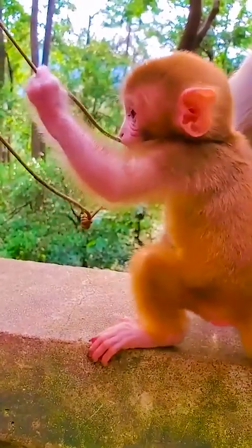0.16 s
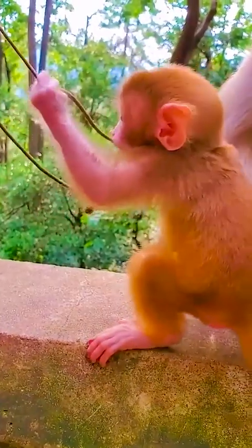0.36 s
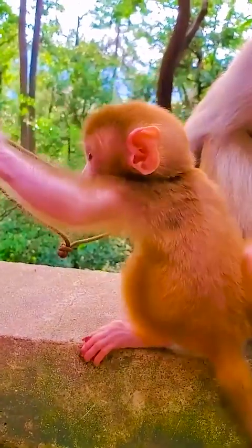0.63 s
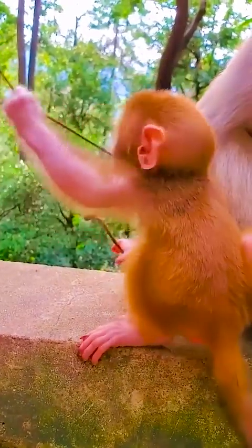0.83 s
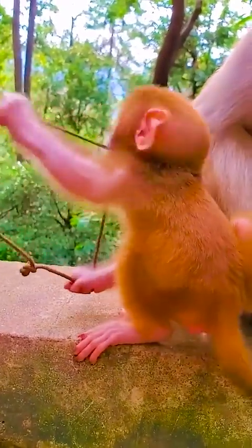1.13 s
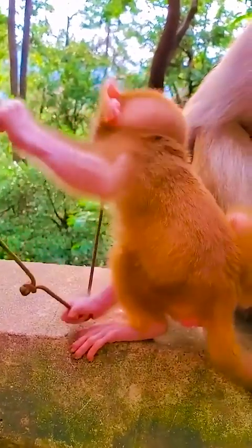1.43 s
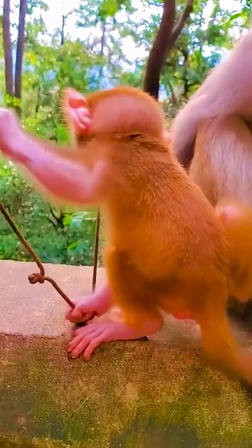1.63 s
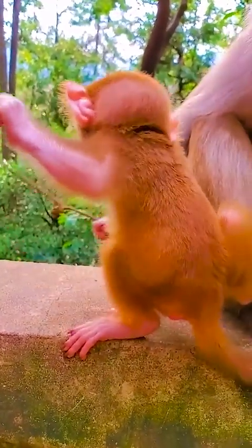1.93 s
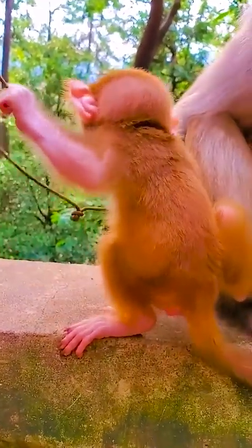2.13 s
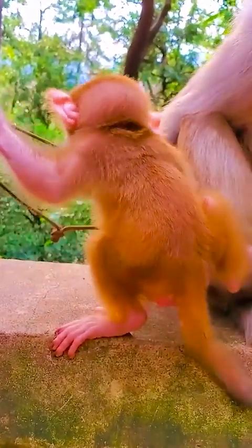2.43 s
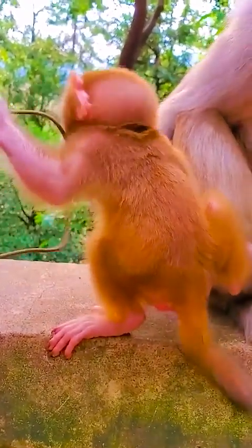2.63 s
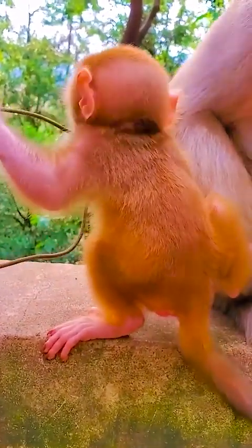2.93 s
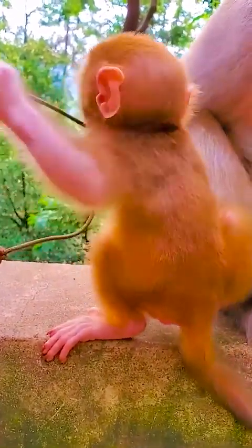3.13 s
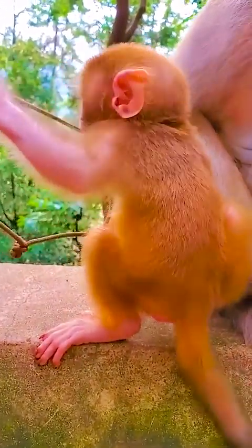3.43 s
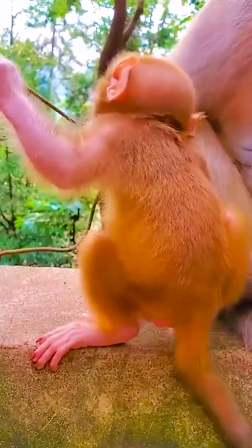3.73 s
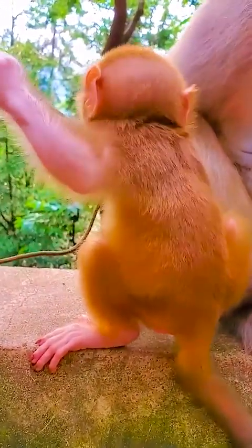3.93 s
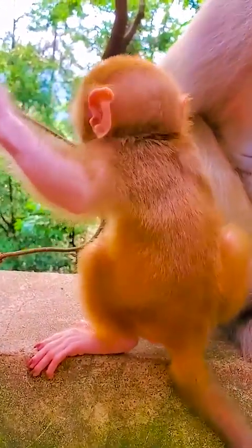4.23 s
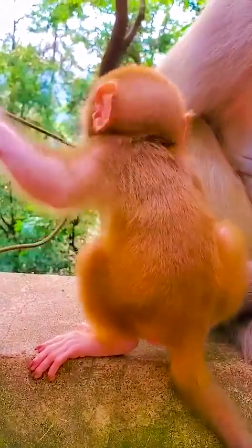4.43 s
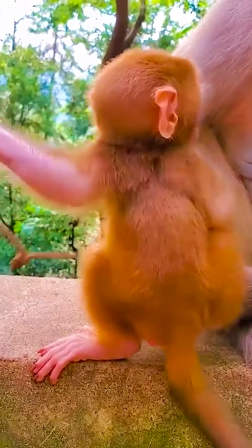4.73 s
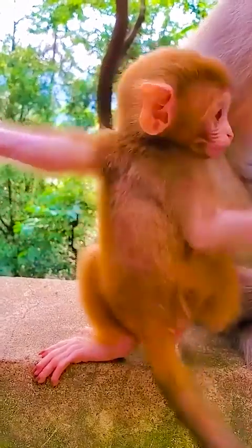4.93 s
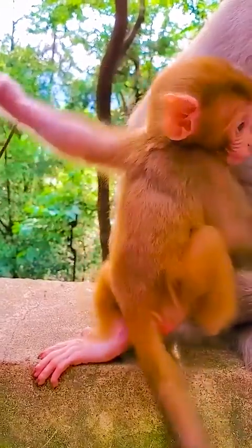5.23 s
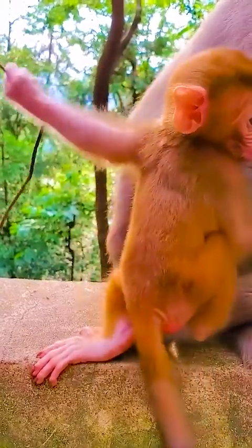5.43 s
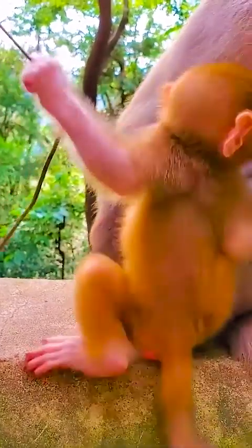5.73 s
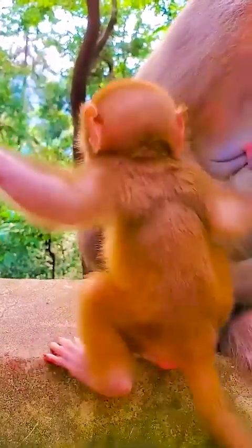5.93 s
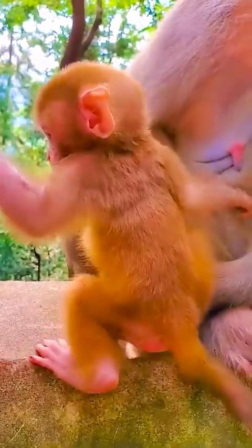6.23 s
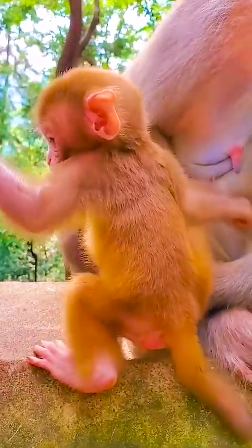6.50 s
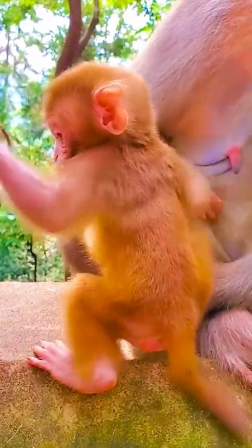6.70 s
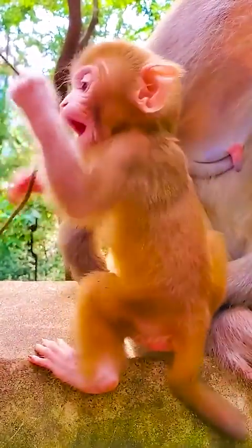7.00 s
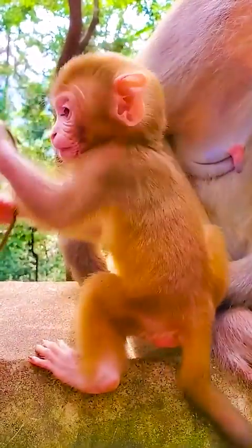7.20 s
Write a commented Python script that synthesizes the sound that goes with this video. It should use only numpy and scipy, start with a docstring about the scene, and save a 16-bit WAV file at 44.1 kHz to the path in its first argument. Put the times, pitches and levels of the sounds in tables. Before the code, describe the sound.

The place is open and wooded, with a quiet low rumble and airy leaf hiss that jump up at about 0.7 seconds. An engine idles underneath as a steady deep hum, rising slightly in pitch by 0.9. Distant birds whistle short gliding notes with woodland echo, most clearly near 1.0, 4.3 and 6.4. Tiny grainy rustles brush by before 2.8. From 2.9 soft, dull knocks tap irregularly at the right until 6.2. At 3.1 a baby monkey gives a soft, hoarse half-second coo that lifts, then drops. From 4.2 it squeals in quick high bursts, close at left: raspy screams at 4.5 and 4.8, cleaner squeaks at 5.3, 5.6 and 5.9, a rising whistle at 6.1, and a brief hollow hoot at 6.3. A longer wavering squeal starts at 6.4; a harsh cry at 6.9 thins into a faint whine until the end at 7.4.

```python
"""Baby monkey calling in a wood

A baby monkey on a wall coos once, then squeals in quick bursts close to the left microphone, with one hollow hoot.
Its voice is built from harmonics that flip between clean whistle and harsh rasp, and it overloads the recorder.
Behind it an engine hums in firing orders, and far birds whistle gliding notes into the echo of the trees.
Soft damped knocks come from the right; grainy brushes and an early jump in level colour the rumble and hiss."""
import sys
import numpy as np
from scipy import signal
from scipy.fft import rfft, irfft, next_fast_len
from scipy.io import wavfile

SR = 44100
rng = np.random.default_rng(int(sys.argv[2]) if len(sys.argv) > 2 else 0)


def waveform_to_disk(signal):
    """Save audio, clipped to [-1, 1], as 16-bit WAV at the path in sys.argv[1]."""
    frames = np.transpose(np.atleast_2d(signal))
    scaled = np.clip(frames, -1, 1) * 32767
    samples = np.round(scaled).astype(np.int16)
    wavfile.write(sys.argv[1], SR, samples)


N = 324576
TIME = np.arange(N) / SR

# the coo as a gesture of the voice: time_s, pitch_hz, effort_db
COO = [(3.075, 660, -44), (3.241, 634, -40), (3.281, 693, -36), (3.359, 731, -31), (3.501, 759, -29),
       (3.533, 707, -31), (3.555, 606, -50)]
# a brief hollow hoot: start_s, length_s, pitch_hz, level_db, third_harmonic_db
HOOT = (6.284, .039, 772, -20, -11)
# far bird notes, each: length_s, start_hz, end_hz, fade_db, burr (share of the pitch)
FALLING_NOTE = (.3, 3400, 2110, -16, .02)
RISING_NOTE = (.2, 2950, 3090, -22, .02)
THIN_NOTE = (.2, 4290, 4260, -10, .008)
STEADY_NOTE = (.2, 3920, 3930, -6, .025)
HIGH_NOTE = (.16, 4540, 4510, -9, .025)
LOW_NOTE = (.17, 2680, 2740, -11, .02)


def amp(db):
    """Decibels to gain."""
    return 10 ** (np.asarray(db) / 20)


def unit(x):
    """Scales to rms 1."""
    return x / np.sqrt(np.mean(abs(x) ** 2) + 1e-20)


def read(points, hz):
    """Reads a spectrum table on a log-frequency axis."""
    f, value = np.transpose(points)
    return np.interp(np.log(hz + 1), np.log(f + 1), value)


def curves(rows, t=None):
    """The columns of a table at each sample, over its own span unless times are given."""
    s, *columns = np.transpose(rows)
    t = np.arange(s[0], s[-1], 1 / SR) if t is None else t
    return [np.interp(t, s, column) for column in columns]


def add(mix, s, sound):
    """Mixes a sound in at a time in seconds."""
    part = mix[max(round(s * SR), 0):][:len(sound)]
    part += sound[:len(part)]


def colour(x, points):
    """Filters by a spectrum table."""
    size = min(N, next_fast_len(2 * x.shape[-1]))
    gain = amp(read(points, np.fft.rfftfreq(size, 1 / SR)))
    return irfft(rfft(x, size) * gain, size)


def wander(size, width_hz):
    """Complex noise of rms 1 that changes at about the given rate."""
    hz = np.fft.fftfreq(next_fast_len(size + 8192), 1 / SR)
    z = rng.standard_normal((len(hz), 2)) @ [1, 1j]
    return unit(np.fft.ifft(z / (1 + (hz / width_hz) ** 4)))[:size]


def phase_of(hz):
    """Running phase of a pitch curve."""
    return 2 * np.pi * np.cumsum(hz) / SR


def faded(x, edge_s=0.00089):
    """Softens both ends."""
    return x * signal.windows.tukey(len(x), min(2 * edge_s * SR / len(x), 1))


def outdoors(rumble_db=-1, rumble_side_db=-16, hiss_db=6, swell_db=2.0, right_treble_db=-4, one_sided=0.67):
    """Low rumble, nearly alike in both ears, under a wide hiss of air and leaves, part of it from the left."""
    # course of the background before the overall trims: time_s, rumble_db, hiss_db
    background_levels = [(0.0, -46.5, -59), (0.665, -45.5, -58), (0.69, -36.5, -50.5), (3.6, -33.5, -49),
                         (7.36, -35, -47.5)]
    # relative spectrum of the rumble: frequency_hz, density_db
    rumble_spectrum = [(10, -42), (22, -6), (36, -7.5), (50, -13.5), (75, -5.5), (100, 2), (135, -1),
                       (165, -7), (205, -15), (290, -17.5), (410, -32), (650, -64), (1200, -100)]
    # relative spectrum of air and leaves: frequency_hz, density_db
    hiss_spectrum = [(200, 3.5), (450, -5), (900, 0.5), (2200, -2.5), (3500, -6), (5000, -11),
                     (9000, -18.5), (15000, -21.5)]
    low_db, air_db = curves(background_levels, TIME)
    middle, side, shared, left, right = rng.standard_normal((5, N))
    side = colour(side, [(60, -6), (150, 0), (300, 12)])  # shorter waves differ more between the ears
    side_rumble = amp(rumble_side_db) * unit(colour(side, rumble_spectrum))
    rumble = unit(colour(middle, rumble_spectrum)) + np.array([[1], [-1]]) * side_rumble
    late = np.roll(shared, 25)  # samples; the shared part reaches the right ear later
    left = left + one_sided * shared
    right_colour = [(500, 1), (2000, -5), (5000, right_treble_db), (15000, -3.5)]
    right = colour(right + one_sided * late, right_colour)
    hiss = unit(colour(np.array([left, right]), hiss_spectrum))
    swell = swell_db * wander(N, 3.4).real
    return amp(low_db + rumble_db) * rumble + amp(air_db + hiss_db + swell) * hiss


def engine(throb=.11, unsteady=0.4):
    """An idling engine: a slightly throbbing tone at the firing rate and weaker, wavering orders."""
    # course of the idle: time_s, firing_rate_hz, level_db
    idle = [(0.0, 54.3, -51), (0.57, 55.8, -43.5), (0.86, 61.2, -35), (2.09, 61.1, -30.5), (3.3, 61.3, -31),
            (5.18, 59.7, -29), (5.58, 60.0, -32), (6.07, 59.9, -28.5), (7.36, 59.9, -29.5)]
    # partials of the hum: multiple_of_firing_rate, order_level_db
    orders = [(2 / 3, -19), (1, 0), (4 / 3, -23), (2, -10), (7 / 3, -13.5), (10 / 3, -23)]
    firing_hz, level_db = curves(idle, TIME)
    phase = phase_of(firing_hz)
    hum = np.zeros(N)
    for k, order_db in orders:
        depth = throb if k == 1 else unsteady
        wavering = 1 + depth * wander(N, 3.6)
        hum += amp(order_db) * (wavering * np.exp(1j * k * phase)).real
    return np.sqrt(2) * amp(level_db) * hum


def trees(x):
    """Scatter from trunks and leaves: sparse taps, unrelated per ear, each band dying at its own speed."""
    # decay of the echo in the wood: frequency_hz, t60_s
    wood_decay = [(300, 0.2), (2000, 0.84), (3500, 1.35), (8000, 1.1), (15000, 0.55)]
    taps = rng.standard_normal((2, SR)) * (rng.random((2, SR)) < .06)
    hz, t, z = signal.stft(taps, SR, nperseg=256)
    decay = amp(-60 * t / read(wood_decay, hz)[:, None])
    z = z * decay * np.minimum(t / 0.005, 1)
    tail = signal.istft(z, SR, nperseg=256)[1]
    return signal.fftconvolve(x[None], tail / np.linalg.norm(tail[0]), axes=1)[:, :N]


def birds(direct_db=-5, right_db=-5, octave_db=-30):
    """Far whistled notes that glide to a pitch with a fast burr and fade, half lost in their own echo."""
    # calls, levels before the path gains: start_s, level_db, note
    bird_calls = [(0, -53, THIN_NOTE), (0.92, -52, THIN_NOTE), (1.04, -29, FALLING_NOTE),
                  (1.781, -40.5, RISING_NOTE), (2.889, -47.5, STEADY_NOTE), (2.918, -49.5, HIGH_NOTE),
                  (3.55, -48, STEADY_NOTE), (4.265, -31, FALLING_NOTE), (4.97, -51, RISING_NOTE),
                  (6.43, -27.5, FALLING_NOTE), (7.17, -45, LOW_NOTE)]
    rise_s, glide_s = .02, .05
    song = np.zeros(N)
    for s, level_db, (length_s, start_hz, end_hz, fade_db, burr) in bird_calls:
        t = np.arange(0, length_s, 1 / SR)
        hz = end_hz + (start_hz - end_hz) * np.exp(-t / glide_s)
        envelope = np.minimum(t / rise_s, 1) * amp(level_db + fade_db * (t / length_s) ** 2)
        phase = phase_of(hz * (1 + burr * wander(len(hz), 142).real))
        whistle = np.sin(phase) + amp(octave_db) * np.sin(2 * phase)
        add(song, s, faded(envelope * whistle, 0.0027))
    return np.sqrt(2) * amp([[0], [right_db]]) * (amp(direct_db) * song + trees(song))


def knocks(level_db=7, ring_hz=330, decay_s=0.0016, rise_s=0.0003, left_db=-7, delay_s=0.0017):
    """Dull taps near the right microphone: a single heavily damped swing each."""
    # soft knocks, before the delay and overall level: start_s, peak_db
    knock_times = [(2.914, -28), (2.987, -43), (3.442, -27), (3.711, -32.5), (3.966, -29), (4.221, -31),
                   (4.551, -30.5), (4.751, -30.5), (5.21, -27), (5.446, -32), (5.67, -27.5), (5.953, -30),
                   (6.199, -32)]
    t, taps = np.arange(900) / SR, np.zeros(N)
    tap = np.cos(2 * np.pi * ring_hz * t) * np.exp(-t / decay_s) * (1 - np.exp(-(t / rise_s) ** 2))
    for s, peak_db in knock_times:
        add(taps, s + delay_s, amp(peak_db + level_db) * tap / tap.max())
    return amp([[left_db], [0]]) * taps


def rustles(grain_db=3):
    """Short grainy noise brushes, stronger on the left, as the monkey shifts its grip."""
    # brushes of fur and twig, levels before colouring: start_s, length_s, level_db
    brushes = [(.24, 0.011, -55), (0.788, 0.0091, -50), (.8, 0.17, -54.5), (1.7, 0.18, -57),
               (2.375, 0.0147, -54), (2.48, 0.016, -56), (2.727, .08, -57)]
    out = np.zeros(N)
    for s, length_s, level_db in brushes:
        size = int(length_s * SR)
        grain = amp(level_db + grain_db * wander(size, 200).real)
        add(out, s, grain * np.hanning(size) * rng.standard_normal(size))
    return amp([[3], [-3]]) * colour(out, [(500, -6), (2500, -5), (8000, 6), (15000, -11)])


def coo(jitter=.01, breath=.7, second_db=-3, upper_db=-4.5, hoarse_db=-32, patchy_db=5):
    """A soft low call: two strong harmonics and a faint stack shaped by the throat, hoarse as it lifts."""
    # throat resonances over the upper stack: frequency_hz, gain_db
    coo_throat = [(1900, 13), (2300, 2), (3000, -19), (4500, -3), (5200, 7.5), (6200, 2), (7300, 5.5),
                  (8000, -2), (9600, 0), (11000, -20)]
    # relative spectrum of air through the throat: frequency_hz, density_db
    hoarse_spectrum = [(1000, -11), (2400, -9), (3300, 0.5), (3900, 4), (4500, -18), (7000, -20),
                       (12000, -31)]
    loud_db, bloom = -30, .45  # overtones gain this many extra dB for each dB of effort
    hoarse_at_s, hoarse_fade_db_per_s = 3.34, 70  # the air is loudest as the pitch lifts
    hz, effort_db = curves(COO)
    size = len(hz)
    overtones_db = effort_db + bloom * (effort_db - loud_db)
    air_db = hoarse_db - hoarse_fade_db_per_s * abs(COO[0][0] + TIME[:size] - hoarse_at_s)
    phase = phase_of(hz * (1 + jitter * wander(size, 146).real))
    stack = np.zeros(size)
    for k in range(3, 16):
        breathy = 1 + breath * wander(size, 110)
        patchy = amp(patchy_db * wander(size, 8.4).real)
        stack += amp(read(coo_throat, k * hz)) * (breathy * patchy * np.exp(1j * k * phase)).real
    low = amp(effort_db) * np.cos(phase) + amp(overtones_db + second_db) * np.cos(2 * phase)
    air = amp(air_db) * unit(colour(rng.standard_normal(N), hoarse_spectrum)[:size])
    return faded(np.sqrt(2) * low + amp(overtones_db + upper_db) * unit(stack) + air, 0.013)


def hoot(jitter=.012, edge_s=.012):
    """A short steady note through rounded lips: fundamental and third harmonic only."""
    _, length_s, hz, level_db, third_db = HOOT
    phase = phase_of(hz * (1 + jitter * wander(int(length_s * SR), 150).real))
    tone = np.cos(phase) + amp(third_db) * np.cos(3 * phase)
    return faded(np.sqrt(2) * amp(level_db) * tone, edge_s)


def throat(hz, effort_db, mouth):
    """Levels of fundamental, second harmonic and the rest: all follow effort, shaped by throat and mouth."""
    # resonances that the two lowest harmonics sweep through: frequency_hz, gain_db
    resonances = [(1500, 5), (2400, 1.5), (2950, 2.5), (3400, 6.5), (3800, 2.5), (4300, 1), (5000, -1.5),
                  (5600, -5), (6200, 0), (7400, 1), (9500, -1)]
    closed_db = -24  # overtones once the mouth has closed
    gape_start_db, gape_end_db, second_db, _, closing_s = mouth
    left_s = np.arange(len(hz))[::-1] / SR
    overtones_db = effort_db + closed_db * np.clip(1 - left_s / max(closing_s, 1 / SR), 0, 1)
    gape_db = np.linspace(gape_start_db, gape_end_db, len(hz))  # a wide gape weakens the fundamental
    first_db = effort_db + read(resonances, hz) - gape_db
    return first_db, overtones_db + read(resonances, 2 * hz) + second_db, overtones_db


def squeak(length_s, effort_db, rough, attack_s, arch):
    """Pitch, effort and roughness of a squeak: one arch of pitch under an attack, a hold and a release."""
    kick_s, release_s, rise_power, fall_power = .005, .008, 2.05, 2.7
    start_hz, turn_hz, end_hz, turn, kick_hz = arch
    t = np.arange(0, length_s, 1 / SR)
    before = np.interp(t / length_s, [0, turn], [1, 0])
    after = np.interp(t / length_s, [turn, 1], [0, 1])
    hz = turn_hz + (start_hz - turn_hz) * before ** rise_power + (end_hz - turn_hz) * after ** fall_power
    envelope = np.clip(t / attack_s, 1e-3, 1) * np.clip((length_s - t) / release_s, 1e-3, 1)
    return hz + kick_hz * np.exp(-t / kick_s), effort_db + 20 * np.log10(envelope), rough


def squeal(hz, effort_db, rough, mouth, jitter=.05, tremor=.006, flutter_db=1.5,
           rasp_share=0.97, breath=0.001, attack_s=0.00079):
    """Tight vocal folds whistle; in chaos, pitch and level flutter and harmonics give way to a broad rasp."""
    # shape of the upper harmonics: frequency_hz, gain_db
    wide_mouth = [(2200, 18), (4500, 1), (7000, -12), (9500, 1.5), (12500, 1), (15000, -1.5), (17000, -11),
                  (20000, -37)]
    # colour of the rasp: frequency_hz, gain_db
    rasp_colour = [(900, -17.5), (2000, -10.5), (3000, 0), (4200, -4.5), (5200, -3.5), (8000, -0.5),
                   (15000, -3.5), (19000, -18)]
    first_db, second_db, upper_db = throat(hz, effort_db, mouth)
    bright_db = mouth[3]
    size, rough = len(hz), np.clip(rough, 0, 1)
    t = np.arange(size) / SR
    shake = tremor * wander(size, 350).real + jitter * rough * wander(size, 110).real
    phase = phase_of(hz * (1 + shake))
    upper = amp([read(wide_mouth, k * hz) + bright_db * min(k, 6) for k in range(3, 11)])
    upper = amp(upper_db) * upper / np.linalg.norm(upper, axis=0)
    whistle, rasp = np.zeros((2, size))
    for k, height in enumerate([amp(first_db), amp(second_db), *upper], 1):
        flutter = amp(flutter_db * (.5 + .7 * rough) * wander(size, 105).real)
        below_top = np.clip((SR / 2.2 - k * hz) / 1500, 0, 1)  # avoids aliasing
        onset = 1 - np.exp(-t / (attack_s * k))  # high harmonics start last
        turn = height * flutter * below_top * onset * np.exp(1j * k * phase)
        order = .85 if k == 1 else 2.6 * k  # high harmonics lose their order first
        clean = (1 - rasp_share * rough ** 1.3) ** order * (1 - breath)
        breaks = np.sqrt(1 - rough ** 2) + rough * wander(size, 127)  # the whistle catches and slips
        whistle += np.sqrt(clean) * (breaks * turn).real
        # the rasp fills the gaps between harmonics; fleeting side tones come and go in it
        side_tones = sum(wander(size, 30) ** 2 * np.exp(1j * step * phase)
                         for step in rng.uniform(-.45, .45, 2))
        noise = wander(size, 1300 if k == 1 else 2000) + .33 * side_tones
        rasp += np.sqrt(1 - clean) * (unit(noise) * turn).real
    return faded(np.sqrt(2) * (whistle + colour(rasp, rasp_colour)[:size]), 0.0014)


def second_tone(main_hz, coupling=0.56, jitter=0.019, edge_s=.003):
    """A second oscillator in the larynx rides above the main one, which chops it into side tones."""
    # the higher tone: length_s, multiple_of_pitch, level_db
    higher_tone = (.034, 2.48, -6)
    length_s, ratio, level_db = higher_tone
    main_hz = main_hz[:int(length_s * SR)]
    tone = np.cos(phase_of(ratio * main_hz * (1 + jitter * wander(len(main_hz), 600).real)))
    chop = 1 + coupling * np.cos(phase_of(main_hz))
    return faded(amp(level_db) * tone * chop, edge_s)


def monkey(wall_db=-20, wood_db=-29, right_wood_db=-5, sway_hz=9):
    """The voice reaches the left microphone directly, the right one shadowed and by way of wall and bodies."""
    # short squeaks, one pitch arch each: start_s, length_s, effort_db, roughness (0-1), attack_s, arch, mouth
    # arch: start_hz, turn_hz, end_hz, turn_place (0-1), onset_kick_hz (added on top)
    # mouth: gape_start_db, gape_end_db, second_harmonic_db, brightness_db (per harmonic number), closing_s
    squeaks = [ (4.197, .026, -27, .03, .002, (2970, 2950, 2150, .1, 0), (6, -7, 6, -2, .012)),
               (4.317, .053, -11.5, .13, .001, (2500, 3980, 3000, .6, 1200), (4, -3, -1, 0, .022)),
               (5.312, .058, -10, .02, .007, (3130, 3950, 3000, .52, 0), (9, -1, -.5, -1.5, .014)),
               (5.885, .068, -16, .04, .012, (3780, 2930, 2900, .97, 750), (3, 22, 1, -2, .014)),
               (6.267, .039, -21, .1, .016, (3300, 3200, 2780, .1, 0), (13, 12, -3, -1, .01))]
    # longer squeals that waver between whistle and scream: mouth (as above), rows
    # each row: time_s, pitch_hz, effort_db, roughness (0-1)
    squeals = [ ((14, -3, -2, 0, .018), [(4.488, 3450, -8, .45), (4.522, 3050, -7.5, .65),
               (4.548, 4300, -9.5, .85), (4.598, 4950, -12, .55), (4.62, 3850, -10.5, 1),
               (4.664, 3950, -16, 1), (4.675, 4760, -17, .2), (4.708, 3600, -14, .1),
               (4.72, 2520, -17, .1)]), ((1, 6, -17, 3.5, .015), [(4.815, 1877, -14, 1),
               (4.83, 3050, -9, .8), (4.848, 3407, -9, .3), (4.875, 3065, -18.5, .77),
               (4.905, 2887, -8.5, .15), (4.93, 2440, -12.5, .44), (4.947, 1610, -20, .6)]),
               ((14, 16, 1, -3.5, .012), [(5.58, 3700, -15, .02), (5.589, 2936, -16, .15),
               (5.602, 2585, -16, .14), (5.64, 3050, -16, .18), (5.666, 2980, -31, .11),
               (5.688, 2520, -14, .01), (5.708, 2720, -26, 0)]), ((28, -3, -1, -1, .008),
               [(6.103, 2940, -31, .07), (6.142, 3420, -19, .01), (6.159, 3620, -10, .01),
               (6.178, 3660, -12, 0), (6.2, 3950, -8.5, 0), (6.25, 3500, -17.5, .01),
               (6.267, 2700, -21, 0)]), ((10, 2, -5, -1, .02), [(6.407, 1600, -14, .2),
               (6.428, 3400, -12, .25), (6.47, 4125, -13, .45), (6.545, 3640, -21, .95),
               (6.562, 3573, -20, .01), (6.62, 3480, -21, 0), (6.67, 3670, -17, 0),
               (6.71, 4130, -12.5, .11), (6.758, 3150, -14, .65), (6.805, 1536, -22, .6)]),
               ((6, -8, -3.5, .5, .001), [(6.938, 1590, -18, 1), (6.955, 3070, -10, .5),
               (6.975, 4020, -13, .9), (7.015, 4300, -18, .42), (7.063, 2990, -21.5, .42),
               (7.14, 3200, -23, .5), (7.172, 3650, -23.5, .2), (7.19, 3900, -27, .03),
               (7.257, 4020, -26.5, .02), (7.283, 3680, -28, .01), (7.36, 3820, -27, .02)])]
    # the right microphone lies in the shadow of the camera: frequency_hz, gain_against_left_db
    shadow = [(300, 8), (750, -30.5), (1400, 5), (2400, -12), (3600, -12.5), (6000, -15), (9000, -21),
              (15000, -24)]
    voice = np.zeros(N)
    for s, *shape, mouth in squeaks:
        add(voice, s, squeal(*squeak(*shape), mouth))
    for mouth, rows in squeals:
        add(voice, rows[0][0], squeal(*curves(rows), mouth))
    s, *shape, _ = squeaks[1]  # the roughest squeak
    add(voice, s, second_tone(squeak(*shape)[0]))
    add(voice, HOOT[0], hoot())
    add(voice, COO[0][0], coo())
    bent = signal.hilbert(colour(voice, shadow)).imag  # bending round the camera costs about a quarter cycle
    t = np.arange(2000) / SR
    bounces = rng.standard_normal(len(t)) * (rng.random(len(t)) < .1) * np.exp(-t / 0.009)
    echoes = signal.hilbert(signal.oaconvolve(voice, bounces / np.linalg.norm(bounces))[:N])
    right = bent + amp(wall_db) * (echoes * wander(N, sway_hz)).real  # the paths shift as the head turns
    wood_gain = amp([[wood_db], [wood_db + right_wood_db]])
    return np.array([voice, right]) + wood_gain * trees(voice)


def scene():
    """All sources at the two microphones."""
    return outdoors() + engine() + birds() + knocks() + rustles() + monkey()


def record(dry, ceiling=0.94, edge_hz=15920):
    """Peaks bend smoothly into the ceiling of the microphone amplifier; then a low-pass limits the band."""
    fine = signal.resample_poly(dry, 2, 1, axis=1)  # oversampled to reduce aliasing
    bent = fine / (1 + (fine / ceiling) ** 8) ** (1 / 8)
    clipped = signal.resample_poly(bent, 1, 2, axis=1)
    low_pass = signal.firwin(511, edge_hz, window=("kaiser", 8), fs=SR)
    return signal.oaconvolve(clipped, low_pass[None], "same")


dry = scene()
out = record(dry)
waveform_to_disk(out)
```